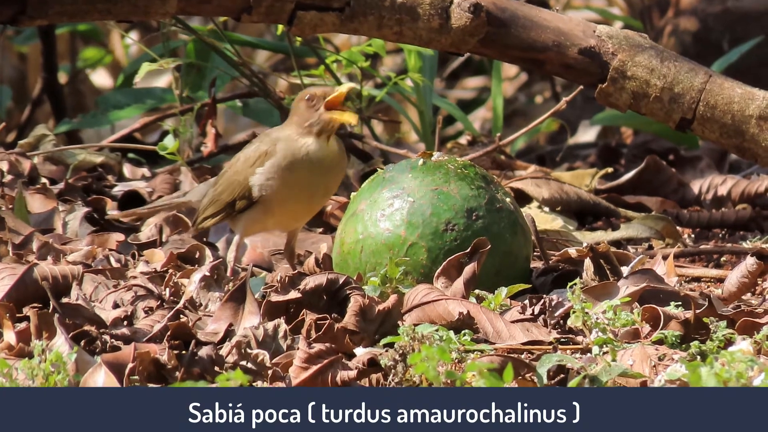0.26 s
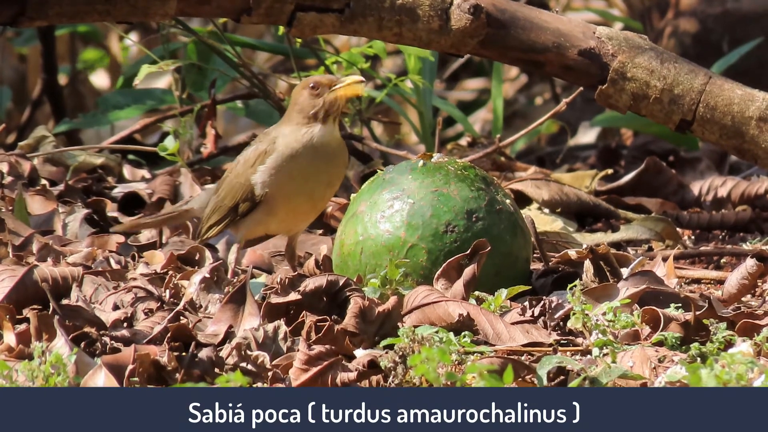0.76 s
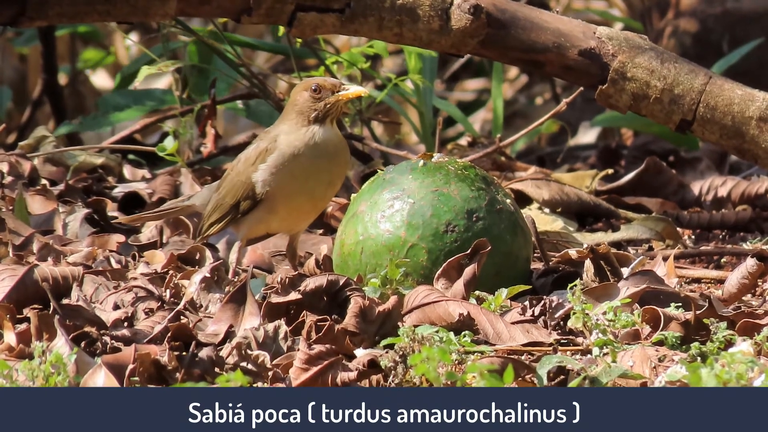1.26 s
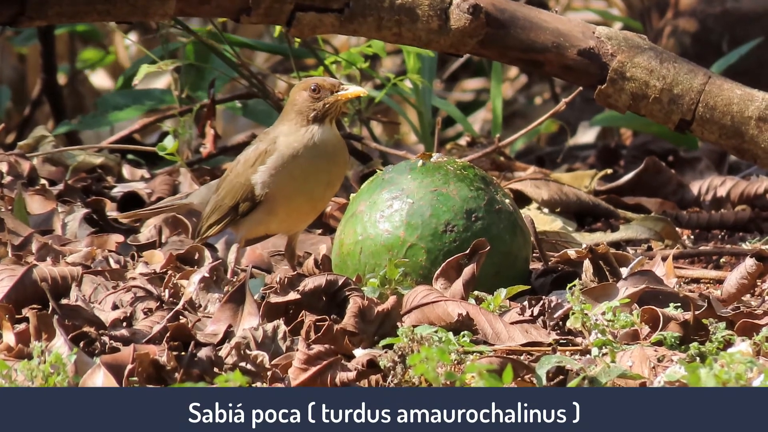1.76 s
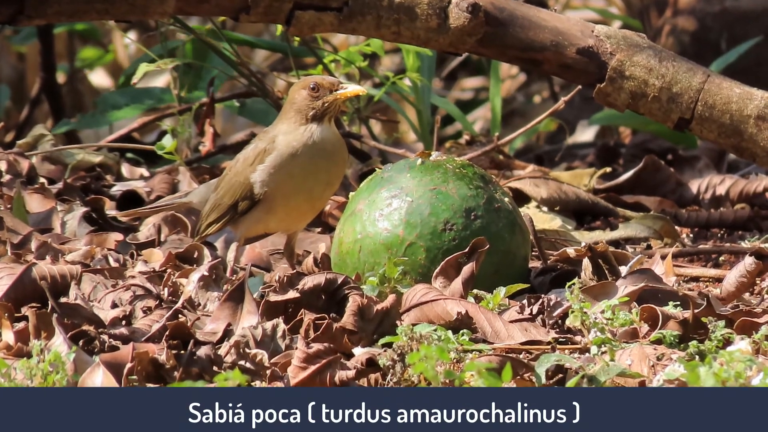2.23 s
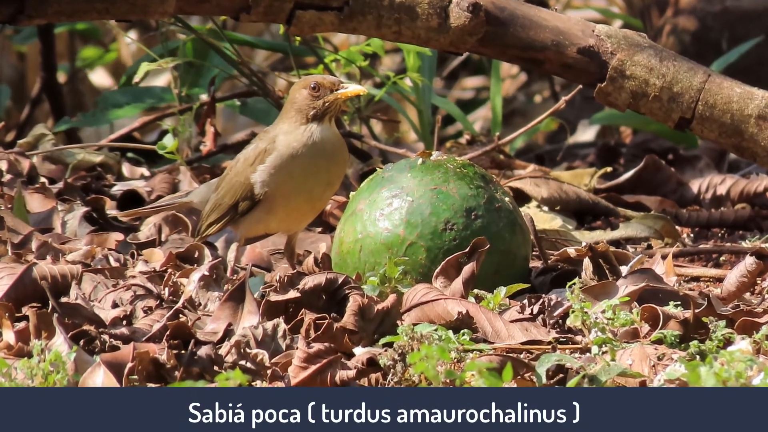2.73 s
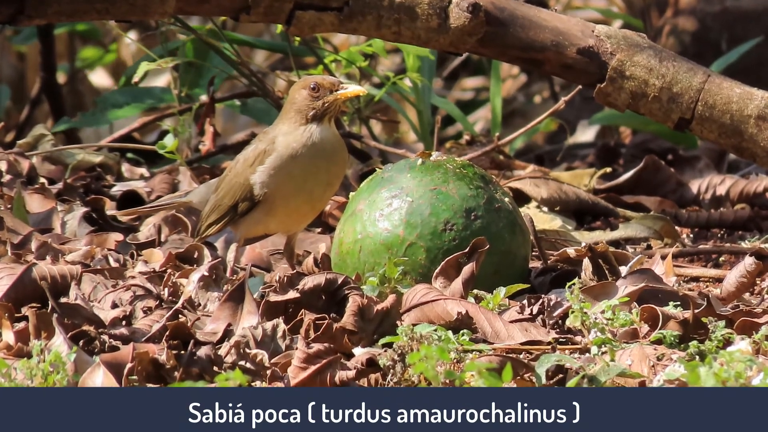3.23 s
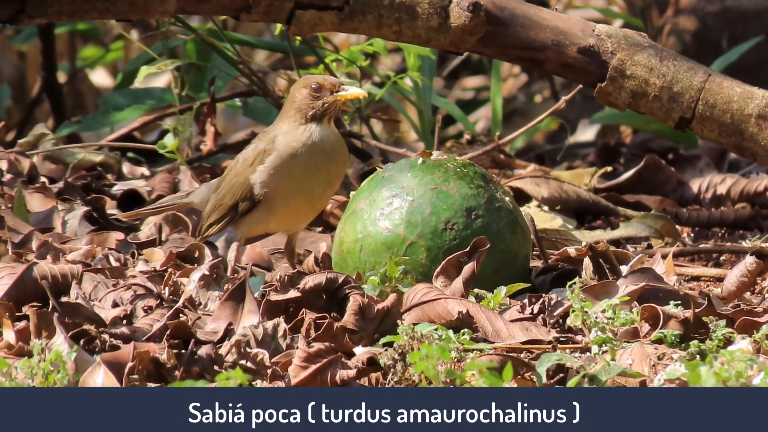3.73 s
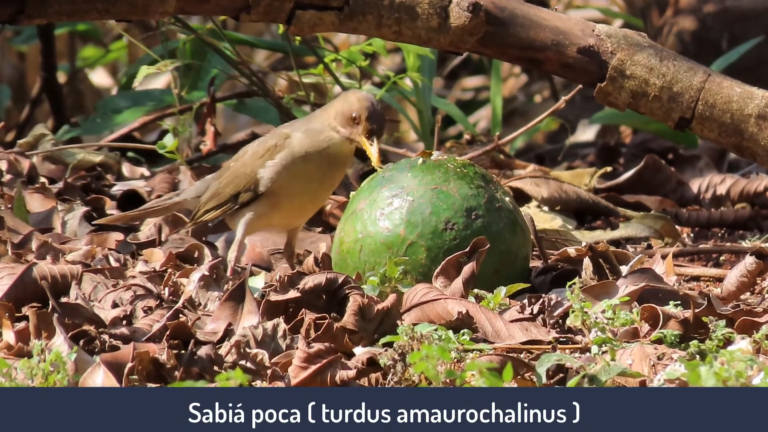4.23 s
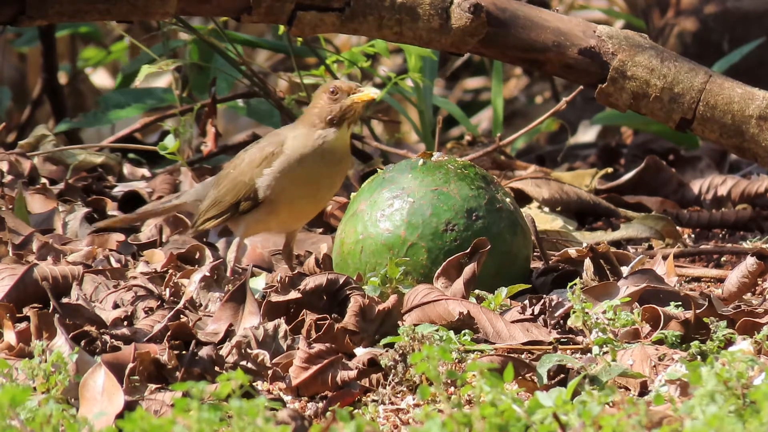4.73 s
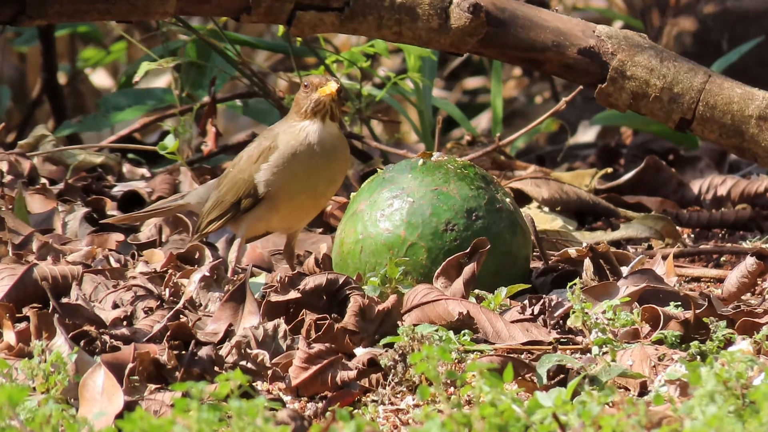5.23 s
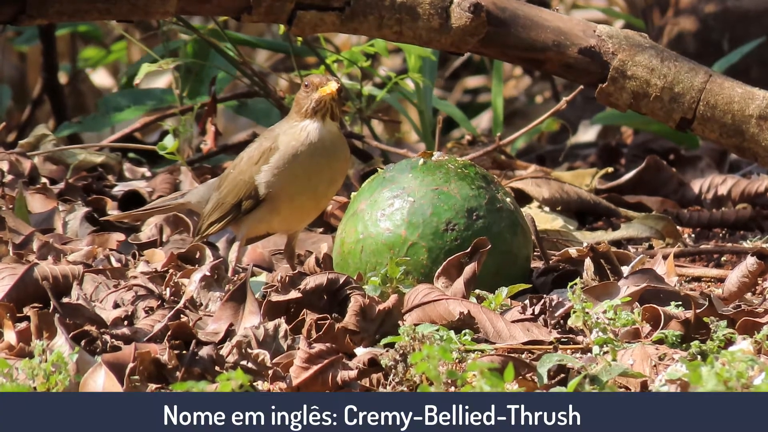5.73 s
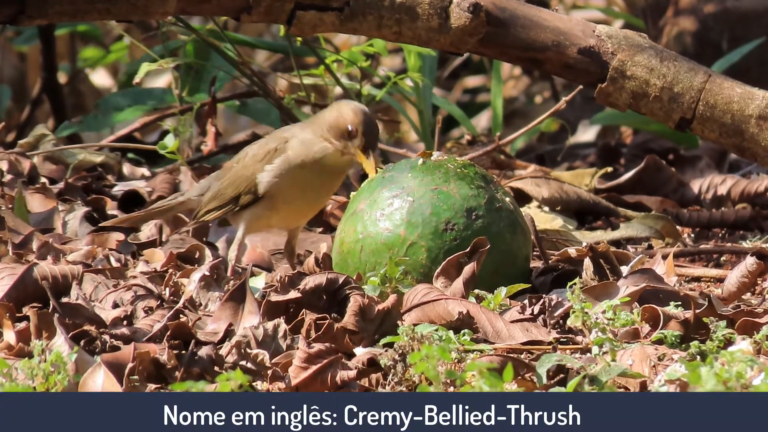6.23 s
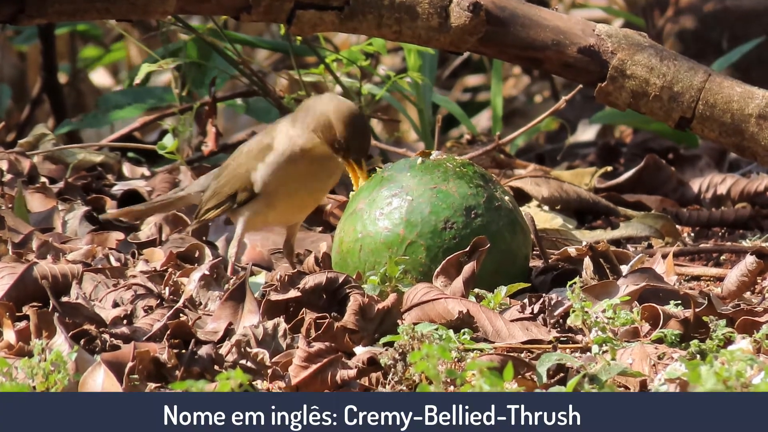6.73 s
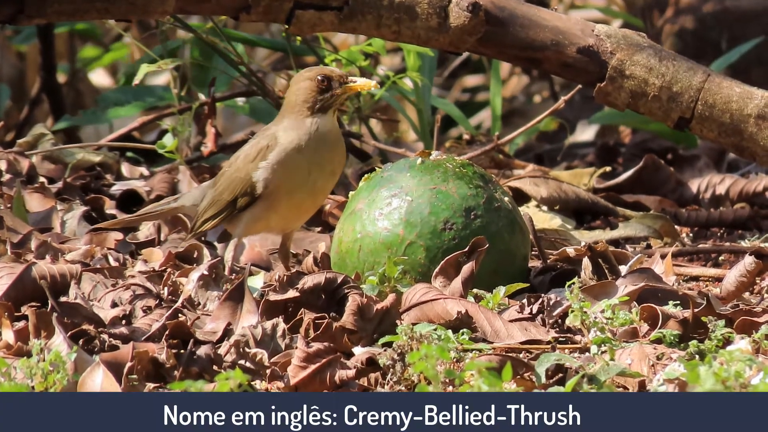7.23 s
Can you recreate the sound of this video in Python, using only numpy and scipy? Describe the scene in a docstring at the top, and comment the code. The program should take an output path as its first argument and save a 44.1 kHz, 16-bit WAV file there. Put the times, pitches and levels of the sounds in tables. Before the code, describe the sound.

Outdoor stereo scene with quiet, wavering air. A thrush slightly right of centre leads, opening with small slurs, then a hook, scoops, a short buzz and an upslur; after a gap come an arch, a falling slur and a fast warble, then the earlier pattern returns and ends on a quavering note. Dry leaf litter crackles softly throughout, with sparse thin chips, distant watery plips and two brief groups of low wind puffs.

```python
"""Wood's edge: a thrush sings short slurs, hooks, buzzes and a warble from a tree.
The song is bent whistles with faint overtones; echoes off branches scatter each one.
A small bird adds thin high chips and far plips sound softly, both as short gliding tones.
Dry leaves tick and crackle as bursts of ringing noise. Two groups of soft low-noise puffs
brush the microphone over a quiet, wavering outdoor hiss."""
import sys
import numpy as np
from scipy import signal
from scipy.fft import rfft, irfft
from scipy.io import wavfile
from scipy.ndimage import uniform_filter1d

SR = 44100
rng = np.random.default_rng(int(sys.argv[2]) if len(sys.argv) > 2 else 0)


def wav_record(signal):
    """Record a signal, one row per channel, as 16-bit PCM in the file named by sys.argv[1]."""
    frames = np.transpose(np.atleast_2d(signal))
    bounded = np.clip(frames, -1, 1)
    # unit amplitude maps onto the largest positive 16-bit level
    quanta = np.round(bounded * 32767).astype(np.int16)
    wavfile.write(sys.argv[1], SR, quanta)


N = 330307  # samples
TOP_HZ = 15200

# outdoor hiss, relative spectrum: (frequency [Hz], level [dB])
AIR_SPECTRUM = [(20, -6.5), (60, 0), (135, 0), (230, -6), (430, -6.5), (630, -0.5), (800, -7.5), (990, 0.5),
                (1250, -3.5), (1550, -1.5), (4000, -5), (6100, -8), (8200, -8.5), (9400, -12.5),
                (15000, -13.5)]
# puffs of air: (centre time [s], half length [s], level [dB])
PUFFS = [(2.478, 0.017, -65), (2.58, 0.035, -57), (2.666, 0.036, -59.5), (2.746, 0.023, -56.5),
         (2.82, 0.067, -64), (3.164, 0.037, -57.5), (3.254, 0.057, -56.5)]
# clearest leaf ticks: (time [s], relative level [dB], centre frequency [Hz])
LEAF_TICKS = [(0.823, -39, 7670), (1.737, -36.5, 4300), (1.8836, -41, 5820), (2.171, -42, 3010),
              (2.266, -41, 7100), (2.907, -40.5, 5040), (3.0644, -44, 3800), (3.259, -42, 4340),
              (3.69, -42, 6820), (3.903, -39, 6500), (4.096, -39.5, 3220), (4.43, -44, 4710),
              (5.0178, -45.5, 8650), (5.092, -40.5, 4700), (5.6109, -38, 4670), (6.1855, -38, 3800),
              (6.7554, -41, 5250)]
# stirring of the leaf litter, relative: (time [s], level [dB])
LITTER_STIR = [(0, -55.5), (1.64, -53.5), (2.1, -56.5), (3.53, -54.5), (4.44, -55), (5.4, -53.5),
               (6.2, -52.5), (6.72, -55), (7.3, -49.5)]
# far plips, bending upwards: (time [s], length [s], middle pitch [Hz], last/first pitch [ratio], level [dB])
PLIPS = [(.215, 0.022, 1020, 1.9, -56.5), (.226, 0.018, 653, 1.35, -58), (1.175, 0.0316, 1100, 1.43, -57),
         (1.32, 0.015, 1010, 1.09, -57), (1.825, 0.02, 380, 1.2, -65), (1.898, 0.028, 575, 1.43, -59),
         (2.112, 0.02, 973, 1.18, -47), (2.348, .018, 982, 1.17, -48), (2.653, 0.012, 1040, 1.25, -53.5),
         (3.53, 0.023, 1500, 1.3, -56), (4.222, 0.021, 600, 1.36, -55), (4.256, .015, 1000, 1.12, -49),
         (5.11, 0.021, 1420, 1.15, -55), (6.936, 0.014, 1000, 1.4, -52.5), (7.12, .045, 566, 2.4, -56.5)]
# soft low bumps: (time [s], level [dB])
BUMPS = [(0.624, -64), (1.825, -62), (4.166, -61), (7.05, -63.5)]
BUMP_S, BUMP_HZ, BUMP_BEND = 0.038, 143, 0.47  # length, middle pitch, last/first pitch
# small bird's chips: (time [s], length [s], middle pitch [Hz], last/first pitch [ratio], level [dB])
CHIPS = [(1.086, 0.017, 8540, 1.34, -54), (1.102, 0.012, 8200, .94, -59), (1.21, 0.011, 7700, 0.57, -58),
         (1.221, 0.016, 7500, 0.63, -61), (2.71, 0.014, 7480, 0.59, -45), (2.722, 0.016, 7200, 0.64, -47.5),
         (3.239, .019, 8160, 1.14, -53.5), (5.059, 0.014, 8230, 1, -55), (5.402, .012, 7600, .7, -58),
         (6.283, 0.018, 8800, 1.24, -57.5), (6.978, .028, 7750, 0.8, -56), (7.066, 0.026, 6600, 2.6, -56),
         (7.1, 0.014, 8100, 0.66, -57), (7.12, 0.023, 5140, .7, -53.5)]

# thrush levels are relative, ahead of the song gain
SONG_NEAR_DB = -14  # near-branch echoes
# overtones let out by throat and beak: (frequency [Hz], level re whistle [dB])
THROAT = [(4000, -36.5), (4700, -39.5), (5500, -40), (6700, -40.5), (8500, -50), (9600, -46), (10200, -32),
          (11500, -58)]
# pitch swings in a note: (first crest [s], end [s], first rate [Hz], last rate [Hz], depth [Hz])
TRILLS = [(1.969, 2.029, 168, 116, 225), (6.3845, 6.449, 170, 137, 220), (7.358, 7.432, 59, 59, 200),
          (7.453, 7.53, 59, 59, 205)]
TRILL_PULSE_DB = 2  # louder on downward swings, softer on upward ones
# hook, climb to a sharp crest, then a held tone: (share of length [0-1], pitch [Hz], level [dB])
HOOK = [(0, 1866, -15.5), (.05, 2046, -14.5), (.12, 2070, -15), (.21, 2130, -4), (.264, 2696, -3),
        (.31, 2355, 1), (.4, 2230, -5.5), (.49, 2145, -1.5), (.58, 2104, -7), (.88, 2090, -11),
        (1, 2140, -23)]
# upslur, two swells on a rise that ends steeply: (share of length [0-1], pitch [Hz], level [dB])
UPSLUR = [(0, 1998, -15.5), (0.079, 2100, -4.5), (.22, 2182, 0.5), (.41, 2223, -4), (.57, 2283, -9.5),
          (.73, 2417, -1.5), (.84, 2530, -2), (.91, 2764, -2), (.955, 3040, -7), (1, 3440, -17)]
# lead-in, swelling rise ahead of a run of scoops: (share of length [0-1], pitch [Hz], level [dB])
LEAD_IN = [(0, 2520, -14), (.22, 2647, -10.5), (.53, 2690, 0.5), (.76, 2920, 1), (.91, 3200, -4.5),
           (1, 3300, -32)]
# level tone closing a run of scoops: (share of length [0-1], pitch [Hz], level [dB])
CLOSE = [(0, 2150, -5), (.1, 2438, 0.5), (.36, 2410, 0), (.62, 2410, -1), (.85, 2385, -4.5), (1, 2370, -25)]
# swell, tone that grows, then drops away: (share of length [0-1], pitch [Hz], level [dB])
SWELL = [(0, 2283, -9), (.2, 2320, -6), (.45, 2377, -1), (.7, 2402, 1), (.82, 2296, -5), (1, 2000, -11.5)]
# buzz, sinking centre of a fast trill: (share of length [0-1], pitch [Hz], level [dB])
BUZZ = [(0, 2402, -10), (.17, 2365, -4.5), (.34, 2405, -3), (.52, 2367, 0.5), (.68, 2195, -3),
        (.8, 2075, -3.5), (1, 1870, -8.5)]
# song: (start [s], length [s], note shape, pitch shift [Hz], level added to the shape [dB])
NOTES = [(.201, 0.071, SWELL, 19, -31), (0.287, .056, SWELL, -31.5, -32), (.877, 0.23, HOOK, 5, -33),
         (1.384, 0.047, LEAD_IN, 4, -36), (1.511, 0.085, CLOSE, -9, -37.5), (1.966, 0.089, BUZZ, 21, -36),
         (2.351, 0.22, UPSLUR, 2.5, -36), (5.239, 0.22, HOOK, -5, -30), (5.763, .047, LEAD_IN, -3, -37.5),
         (5.892, 0.11, CLOSE, 4, -35), (6.385, 0.093, BUZZ, 30, -36), (6.781, 0.22, UPSLUR, -3, -34.5)]
# arching note: (time [s], pitch [Hz], level [dB])
ARCH = [(3.391, 2168, -51.5), (3.437, 2318, -40), (3.451, 2410, -33), (3.471, 2720, -35.5),
        (3.483, 2813, -31), (3.493, 2737, -34), (3.511, 2350, -31), (3.517, 2344, -31)]
# long dipping slur: (time [s], pitch [Hz], level [dB])
DIP = [(3.963, 2750, -45), (3.975, 2530, -33.5), (4.023, 2103, -34), (4.037, 1988, -40.5),
       (4.067, 1939, -35), (4.097, 2023, -43), (4.145, 2160, -37.5), (4.185, 2184, -40), (4.2, 2150, -52)]
# slide into the warble: (time [s], pitch [Hz], level [dB])
SLIDE = [(4.603, 1936, -44.5), (4.613, 2030, -47.5), (4.632, 2680, -35)]
# centre of the last, quavering note: (time [s], pitch [Hz], level [dB])
QUAVER = [(7.330, 3206, -48), (7.342, 2960, -39.5), (7.352, 2850, -36), (7.358, 2580, -35.5),
          (7.38, 2560, -35.5), (7.406, 2500, -40.5), (7.427, 2850, -40), (7.445, 2910, -34),
          (7.454, 2590, -31), (7.495, 2500, -39)]
# flicks before, after or over a note: (start [s], length [s], first pitch [Hz], last pitch [Hz], level [dB])
FLICKS = [(.193, 0.017, 2800, 2320, -43.5), (0.275, 0.015, 2950, 2200, -40.5),
          (0.337, 0.0088, 2990, 2300, -41.5), (2.054, 0.022, 2830, 2270, -40),
          (3.391, 0.036, 2880, 3400, -49.5), (3.521, 0.029, 2800, 2110, -35.5),
          (3.555, 0.031, 2760, 2160, -40.5), (3.961, 0.0094, 3500, 2600, -47),
          (6.476, 0.025, 2894, 2320, -39.5)]
FLICK_FADE_DB = 0.5  # lost along a flick
# scoops: (start [s], length [s], flick length [s], ledge [Hz], top [Hz], ledge level [dB], flick level [dB])
SCOOPS = [(1.42, 0.045, 0.018, 2547, 3380, -38.5, -34), (1.465, .046, 0.014, 2512, 3380, -35.5, -34),
          (5.803, .047, 0.026, 2590, 3560, -36.5, -32.5), (5.848, 0.048, 0.025, 2606, 3500, -34.5, -33.5)]
SCOOP_ONSET_S, SCOOP_UNDER_HZ = 0.0083, 260  # slide up to the ledge
NOTCH_S, NOTCH_DB = 0.006, 8.5  # level dip before the flick
# scoop's flick after the notch: (share of flick length [0-1], share of rise [0-1], level re flick [dB])
SCOOP_FLICK = [(.4, 0.17, -2.5), (.7, 0.49, -2.5), (1, 1, -17.5)]
# warble, two notes alternating: (time [s], high note [Hz], low note [Hz], level [dB])
WARBLE = [(4.627, 2760, 2390, -39), (4.640, 2760, 2330, -34), (4.672, 2790, 2330, -35.5),
          (4.720, 2790, 2384, -37), (4.790, 2820, 2340, -38), (4.850, 2772, 2383, -41),
          (4.881, 2807, 2400, -41.5)]
# warble pace: (first high note [s], first rate [Hz], last rate [Hz])
WARBLE_PACE = (4.636, 48, 43.4)


def undb(db):
    """Decibels to gain."""
    return 10 ** (np.asarray(db) / 20)


def unit(x):
    """Scale to rms 1."""
    return x / np.sqrt(np.mean(x ** 2) + 1e-20)


def add(track, start_s, x):
    """Mix x into track from a start time."""
    i = max(int(start_s * SR), 0)
    track[i:i + len(x)] += x[:max(len(track) - i, 0)]


def colour(x, points):
    """Shape x with a spectrum of (Hz, dB) points."""
    hz, db = np.transpose(points)
    f = np.maximum(np.fft.rfftfreq(len(x), 1 / SR), 1)
    gain = undb(np.interp(np.log(f), np.log(hz), db))
    return irfft(rfft(x) * gain, len(x))


def band(x, lo_hz, hi_hz, order=2):
    """Band-pass filter."""
    edges_hz = [lo_hz, min(hi_hz, SR / 2 - 1)]
    return signal.sosfilt(signal.butter(order, edges_hz, "band", fs=SR, output="sos"), x)


def walk(rate_hz, size):
    """Random wander: straight lines between normal draws made rate_hz times a second."""
    t = np.arange(size) / SR * rate_hz
    knots = rng.standard_normal(int(t[-1]) + 2)
    return np.interp(t, np.arange(len(knots)), knots)


def slowing(t, start_s, end_s, first_hz, last_hz):
    """A cosine whose rate slides from first_hz to last_hz."""
    age = t - start_s
    cycles = first_hz * age + (last_hz - first_hz) * age ** 2 / (2 * (end_s - start_s))
    return np.cos(2 * np.pi * cycles)


def place(x, pan_db, lag_s=0):
    """Pan stereo by level (positive is left) and by delaying the left channel."""
    delay = np.exp(-2j * np.pi * np.fft.rfftfreq(N, 1 / SR) * lag_s)
    left = irfft(rfft(x[0]) * delay, N)
    return np.array([left, x[1]]) * undb(np.array([[pan_db], [-pan_db]]) / 2)


def scatter(x, delay_s, t60_s, db):
    """Many small echoes off branches and trunks, dying away after a first delay."""
    t = np.arange(SR) / SR
    # cubing makes the echoes sparse
    echoes = rng.standard_normal(SR) ** 3 * undb(-60 * t / t60_s)
    out = np.zeros(N)
    add(out, delay_s, signal.fftconvolve(x, echoes / np.linalg.norm(echoes)))
    return undb(db) * out


def wood(x, near_db, far_db, wide_db=-12):
    """Near branches thicken a sound, crowns blur it, far trunks leave a faint tail."""
    near = scatter(x, delay_s=0.004, t60_s=0.093, db=near_db)
    crowns = scatter(x, delay_s=0.028, t60_s=0.23, db=far_db)
    far = scatter(x, delay_s=0.06, t60_s=0.48, db=far_db - 7)
    wide = scatter(x, delay_s=0.012, t60_s=0.046, db=far_db + wide_db)
    return x + near + crowns + far + np.array([wide, -wide])


def flicker(x, depth_db, rate_hz, count=16):
    """Let each band of a noise waver on its own; the highest bands stay smoother."""
    spectrum = rfft(x)
    # bands widen with frequency
    where = np.interp(np.sqrt(np.fft.rfftfreq(N)), [0, np.sqrt(0.5)], [0, count - 1])
    out = np.zeros(N)
    for k in range(count):
        part = irfft(spectrum * np.clip(1 - abs(where - k), 0, 1), N)
        band_depth_db = depth_db * (1 - (k / count) ** 2)
        out += part * undb(band_depth_db * walk(rate_hz, N))
    return out


def air(air_db=-60.0, side_db=-18, flutter_db=-0.6):
    """Distant outdoor hiss: coloured noise, nearly centred, wider in the low middle."""
    hiss = unit(colour(rng.standard_normal(N), AIR_SPECTRUM))
    mid = flicker(hiss, depth_db=3.5, rate_hz=35) * undb(flutter_db * walk(13, N))
    width = [(60, -6.5), (350, 10.0), (700, 6), (1400, -1.5), (8000, -90.0), (14000, -4)]
    side = unit(colour(colour(rng.standard_normal(N), AIR_SPECTRUM), width))
    return undb(air_db) * (mid + undb(side_db) * np.array([side, -side]))


def puffs():
    """Low eddies swell and fade at the microphone, a little different left and right."""
    t = np.arange(N) / SR
    swell = sum(undb(db) * np.exp(-((t - s) / half_s) ** 2) for s, half_s, db in PUFFS)
    mid, side = (unit(band(rng.standard_normal(N), 24.6, 93)) for _ in range(2))
    return swell * (mid + undb(-12) * np.array([side, -side]))


def snap(hz, width, decay_s, edge_db=-9):
    """Dry crack: a sharp bright edge over noise ringing in a piece of leaf; width is a share of hz."""
    t = np.arange(SR // 40) / SR
    burst = rng.standard_normal(len(t)) * (1 - np.exp(-t / 0.00026)) * np.exp(-t / decay_s)
    ring = band(burst, hz / (1 + width), hz * (1 + width), order=1)
    edge = band(rng.standard_normal(len(t)) * np.exp(-t / 0.00054), 7200, 16000, order=1)
    return ring / np.abs(ring).max() + undb(edge_db) * edge / np.abs(edge).max()


def leaves(tick_db=-1, decay_s=0.0015, crackle_db=2.5, spread_db=2.5, lo_hz=1800, hi_hz=8500, count=520):
    """Dry leaves tick over a fine crackle of random pitches, its level following the stirring."""
    out = np.zeros(N)
    for start_s, db, hz in LEAF_TICKS:
        add(out, start_s, undb(db + tick_db) * snap(hz, width=0.39, decay_s=decay_s, edge_db=-6.0))
    for when, pitch, size, length in rng.random((count, 4)):
        start_s = when * N / SR
        stir_db = np.interp(start_s, *np.transpose(LITTER_STIR))
        db = stir_db + crackle_db + spread_db * min(-np.log(1 - size), 3)
        hz = lo_hz * (hi_hz / lo_hz) ** pitch
        crack = snap(hz, width=0.2, decay_s=0.0038 * (0.091 + length), edge_db=-8)
        add(out, start_s, undb(db) * crack)
    return out


def glides(rows):
    """Bending whistles that swell and fade; row: (time [s], length [s], middle [Hz], bend [ratio], level [dB])."""
    out = np.zeros(N)
    for start_s, length_s, middle_hz, bend, db in rows:
        u = np.linspace(0, 1, int(length_s * SR))
        hz = middle_hz * bend ** (u - 0.5)
        tone = np.sin(2 * np.pi * np.cumsum(hz) / SR)
        add(out, start_s, np.sqrt(2) * undb(db) * np.sin(np.pi * u) * tone)
    return out


def patter(lo_hz=560, hi_hz=1900, db=-72, spread_db=3.5, length_s=0.013, rise=1.148, count=300):
    """Faint short whistles at random moments, each with its own pitch and bend."""
    rows = []
    for when, pitch, size, length, bend in rng.random((count, 5)):
        loud_db = db + spread_db * min(-np.log(1 - size), 3)
        hz = lo_hz * (hi_hz / lo_hz) ** pitch
        rows.append((when * N / SR, length_s * (0.5 + length), hz, rise ** (2 * bend), loud_db))
    return glides(rows)


def far_plips():
    """Rising plips and a few falling low bumps over a fainter patter."""
    bumps = [(s, BUMP_S, BUMP_HZ, BUMP_BEND, db) for s, db in BUMPS]
    return glides(PLIPS) + glides(bumps) + patter()


def small_bird():
    """Thin high chips as gliding tones, a few clear and others faint."""
    faint = patter(lo_hz=6550, hi_hz=10350, db=-73, spread_db=1.5, length_s=0.012, rise=0.85, count=24)
    return glides(CHIPS) + faint


def whistle(hz, db, jitter=0.0049, shimmer_db=0.57):
    """One side of the syrinx: a near-pure tone, its faint overtones weighted by throat resonance."""
    size = len(hz)
    phase = 2 * np.pi * np.cumsum(hz * (1 + jitter * walk(513, size))) / SR
    overtones = sum(undb(np.interp(k * hz, *np.transpose(THROAT))) * np.sin(k * phase) for k in range(2, 6))
    edges = signal.windows.tukey(size, min(0.007 * SR / size, 1))
    return np.sqrt(2) * (np.sin(phase) + overtones) * edges * undb(db + shimmer_db * walk(250, size))


def trill(t):
    """Pitch swing [Hz] at times t; a trill's rate holds or slows, and its swings vary."""
    swing_hz = np.zeros(len(t))
    late_s = 0.00025 * walk(120, len(t))
    for start_s, end_s, first_hz, last_hz, depth_hz in TRILLS:
        opening = np.clip(1 + 2 * (t - start_s) * first_hz, 0, 1)
        closing = np.clip((end_s - t) * last_hz / 2, 0, 1)
        swing = slowing(t - late_s, start_s, end_s, first_hz, last_hz) + 0.17 * walk(177, len(t))
        swing_hz += depth_hz * opening * closing * swing
    return swing_hz


def scoop(start_s, length_s, flick_s, ledge_hz, top_hz, ledge_db, flick_db):
    """Points (s, Hz, dB) of a scoop: up to the ledge, hold, dip, flick."""
    turn_s = start_s + length_s - flick_s
    ledge = [(start_s, ledge_hz - SCOOP_UNDER_HZ, ledge_db - 5.5),
             (start_s + SCOOP_ONSET_S, ledge_hz, ledge_db),
             (turn_s - NOTCH_S, ledge_hz + 25, ledge_db),
             (turn_s, ledge_hz + 50, ledge_db - NOTCH_DB)]
    flick = [(turn_s + share * flick_s, ledge_hz + rise * (top_hz - ledge_hz), flick_db + db)
             for share, rise, db in SCOOP_FLICK]
    return ledge + flick


def strokes():
    """Strokes of the syrinx as points (s, Hz, dB); they overlap where its two sides sound together."""
    notes = [[(start_s + share * length_s, hz + shift_hz, db + level_db) for share, hz, db in note]
             for start_s, length_s, note, shift_hz, level_db in NOTES]
    flicks = [[(start_s, first_hz, db), (start_s + length_s, last_hz, db - FLICK_FADE_DB)]
              for start_s, length_s, first_hz, last_hz, db in FLICKS]
    return notes + flicks + [scoop(*row) for row in SCOOPS] + [ARCH, DIP, SLIDE, QUAVER]


def warble(overlap=0.13, bend_hz=150, uneven_db=1):
    """The two sides of the syrinx take turns; each bends towards the other as it hands over."""
    s, *columns = np.transpose(sorted(WARBLE))
    t = np.arange(s[0], s[-1], 1 / SR)
    high_hz, low_hz, db = (np.interp(t, s, c) for c in columns)
    start_s, first_hz, last_hz = WARBLE_PACE
    late_s = 0.0007 * walk(35, len(t))
    turn = slowing(t - late_s, start_s, s[-1], first_hz, last_hz)
    out = np.zeros(N)
    for side, hz in ((0.98, high_hz), (-0.9, low_hz)):
        opening = np.sin(np.pi / 2 * np.clip(side * turn + overlap, 0, 1))
        pitch_hz = hz - side * bend_hz * (1 - side * turn) + 18 * walk(45.7, len(t))
        add(out, s[0], opening * whistle(pitch_hz, db + uneven_db * walk(42, len(t))))
    return out


def thrush():
    """Each stroke is one whistle, its pitch bent smoothly; a trill makes it throb."""
    out = np.zeros(N)
    for stroke in strokes():
        s, hz, db = np.transpose(sorted(stroke))
        t = np.arange(s[0], s[-1], 1 / SR)
        swing_hz = trill(t)
        slope = np.gradient(swing_hz)
        throb_db = -TRILL_PULSE_DB * slope / (np.abs(slope).max() + 1e-9)
        pitch_hz = uniform_filter1d(np.interp(t, s, hz), size=110) + swing_hz
        add(out, s[0], whistle(pitch_hz, np.interp(t, s, db) + throb_db))
    return out


def scene():
    """Thrush slightly right of centre, small bird to the left, ground and air around them."""
    ground = wood(leaves(), near_db=-9.5, far_db=-23)
    plips = wood(far_plips(), near_db=-11.5, far_db=-26)
    chips = place(wood(small_bird(), near_db=-9, far_db=-47), pan_db=7.5)
    song = wood((thrush() + warble()) * undb(1.04), near_db=SONG_NEAR_DB, far_db=-19.5)
    song = place(song, pan_db=-0.7, lag_s=1.05e-5)
    return air() + puffs() + ground + plips + chips + song


def record(dry):
    """Steep elliptic low-pass: the microphone chain cuts the highest treble."""
    return signal.sosfilt(signal.ellip(10, 0.2, 60, TOP_HZ, fs=SR, output="sos"), dry)


dry = scene()
out = record(dry)
wav_record(out)
```